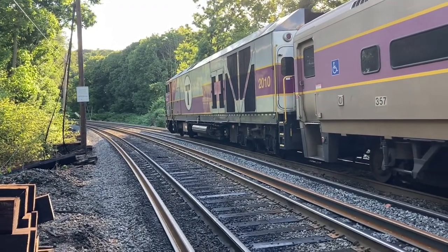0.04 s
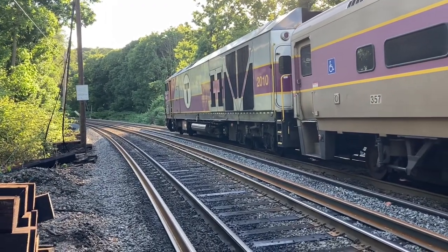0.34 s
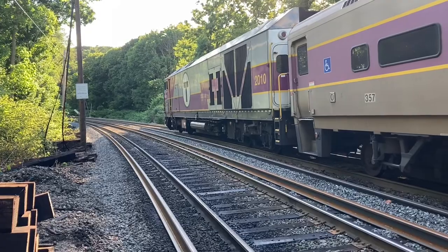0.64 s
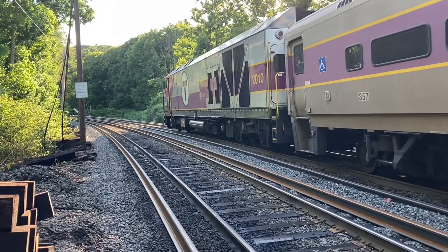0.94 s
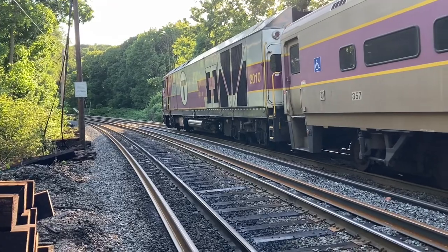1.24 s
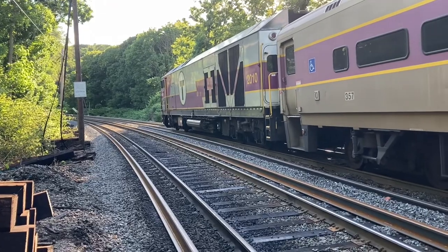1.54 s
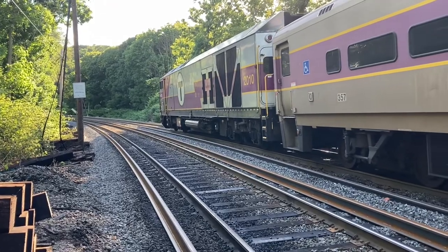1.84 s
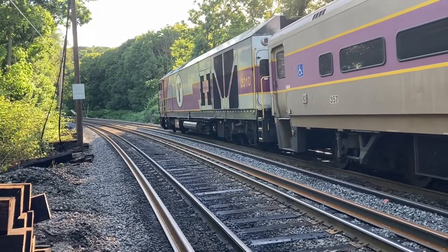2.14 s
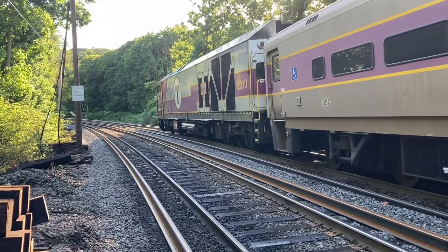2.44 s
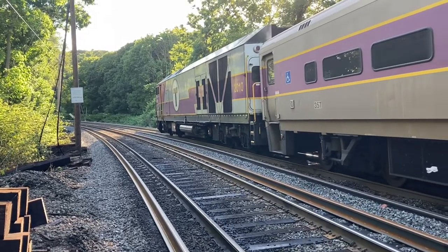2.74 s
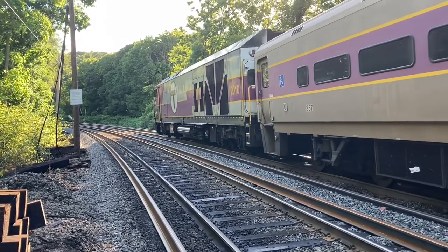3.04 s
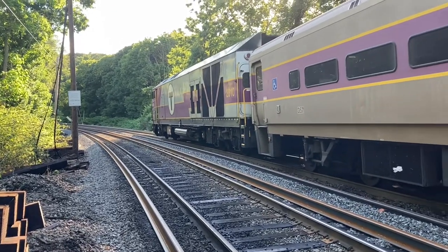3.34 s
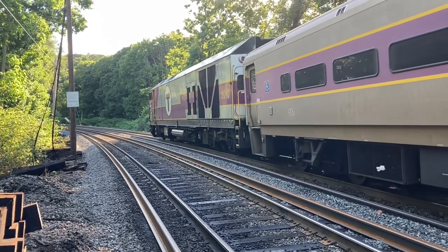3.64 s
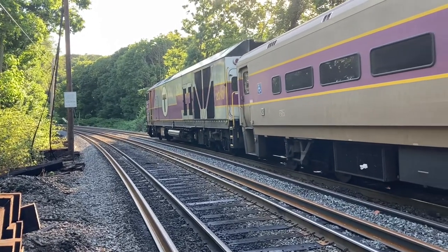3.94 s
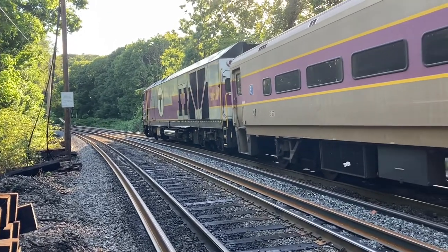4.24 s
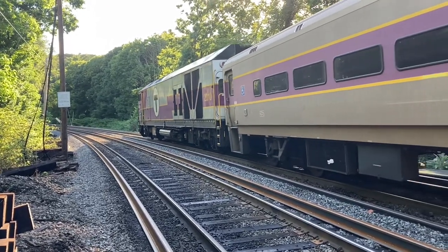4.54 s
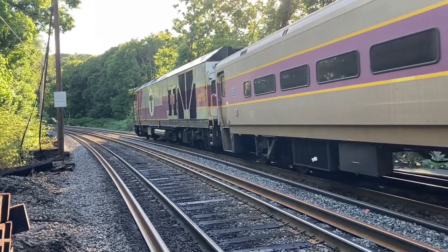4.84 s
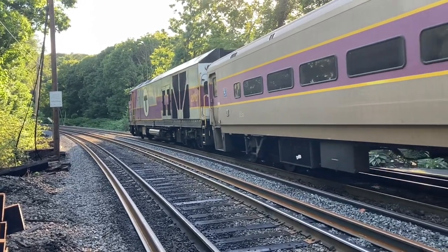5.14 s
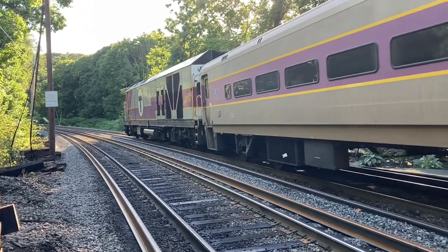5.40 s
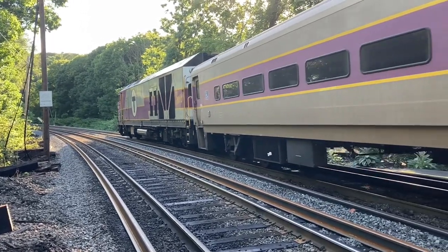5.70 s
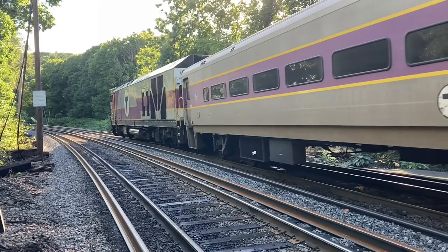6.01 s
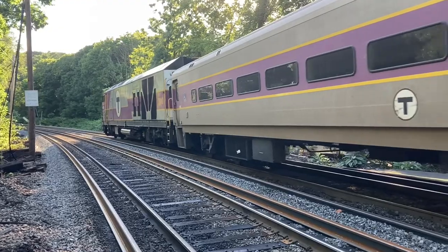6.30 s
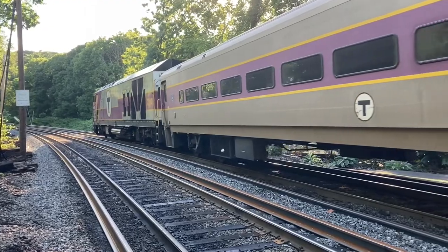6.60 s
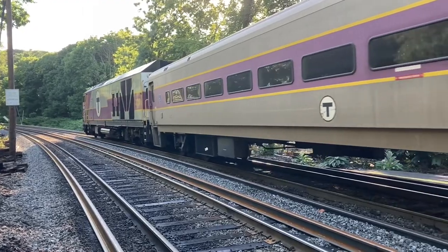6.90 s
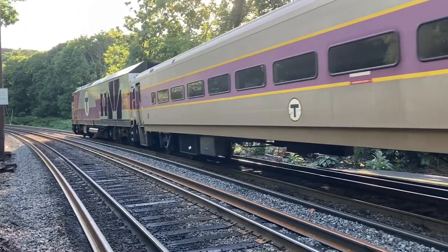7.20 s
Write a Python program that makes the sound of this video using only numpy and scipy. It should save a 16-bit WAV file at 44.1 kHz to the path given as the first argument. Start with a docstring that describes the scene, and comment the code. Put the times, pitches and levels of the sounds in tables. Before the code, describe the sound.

Heard from beside the next track, a passenger train gathers speed behind a throbbing diesel engine. Rushing exhaust and hissing fans ease off gradually as the locomotive draws ahead, with a faint whine and hum underneath. Nearer the microphones, steel wheels roll and let out a few faint, high squeals, then grow louder and rasp against the rail in short bursts toward the end.

```python
"""A diesel commuter train pulls away along a curve, heard on two microphones beside the next track.
Up ahead, the twelve-cylinder engine throbs through its silencer and speeds up; gears whine and the
electric drive hums. The roar of the exhaust and the hiss of the fans slowly recede with the locomotive.
Close by, the coach wheels roll nearer, ring thinly on the curve, squeal as they slip sideways
and now and then grind a flange on the rail."""
import sys
import numpy as np
from scipy import signal
from scipy.io import wavfile
from scipy.ndimage import uniform_filter1d

SR = 44100
rng = np.random.default_rng(int(sys.argv[2]) if len(sys.argv) > 2 else 0)


def digitize_waveform(pressure):
    """Quantize a signal to 16-bit integers and store it at the path in sys.argv[1].

    Rows of a 2-D input are taken as channels; values are limited to [-1, 1].
    """
    field = np.atleast_2d(pressure).T
    bounded = np.clip(field, -1, 1)
    quanta = np.round(bounded * 32767).astype(np.int16)
    wavfile.write(sys.argv[1], SR, quanta)


N = 324576
TIME = np.arange(N) / SR

# Exhaust tones: the twelfth order is the firing rate, the others come from unequal cylinders.
# Each row: multiple of the engine's cycle rate, level in dB before the silencer.
EXHAUST_ORDERS = [(3, -36), (6, -10.5), (9, -27.5), (10, -30), (11, -21.5), (12, -9.3), (13, -25.5),
                  (14, -34.5), (15, -12.5), (16, -31.5), (17, -29), (18, -22.5), (19, -30.5), (20, -32),
                  (21, -26)]
# The silencer's resonances, which the orders climb through. Each row: frequency in Hz, gain in dB.
SILENCER_GAIN = [(34, -22.5), (38, -15), (44, -11.5), (56, -16), (63, -4.5), (68, 0), (75, -4), (84, -11.5),
                 (93, -2.3), (101, -2.3), (110, -7.5), (118, -12), (126, -22), (160, -22)]
# Gear whines. Each row: multiple of the cycle rate, casing resonance in Hz, its width in Hz,
# level in dB on resonance.
GEAR_WHINES = [(66.5, 482, 48, -35), (99.7, 722, 26, -30), (109.9, 675, 46, -31.5), (120, 622, 19, -29.5)]
# Brief narrow-band swells of noise. Each row: peak time in seconds, pitch in Hz, peak level in dB,
# half-length in seconds.
NOISE_SWELLS = [(.28, 300, -28, 0.19), (.493, 610, -22.5, 0.023), (1.928, 628, -19.5, 0.013),
                (2.476, 600, -22, 0.036), (2.882, 611, -22.5, .025), (3.62, 661, -23.5, 0.027),
                (7.004, 690.4, -24.5, .025)]
# Hum of the electric drive. Each row: start and end pitch in Hz, start and end level in dB.
DRIVE_TONES = [(161.2, 136, -30.5, -53), (180, 139, -38, -41.5), (203.3, 243, -34, -42),
               (147.2, 106, -42, -36), (174.9, 174.8, -40.5, -41), (292.8, 292, -36, -49)]

# Tone colours of the four noises. Each row: frequency in Hz, relative density in dB.
ROAR_SPECTRUM = [(20, -18), (45, -3.5), (90, 4.5), (140, -2.5), (240, -5), (300, -4), (410, -4), (510, -5),
                 (620, 3), (720, -4), (790, -6.5), (880, -25.5), (1300, -34), (4000, -75)]
FAN_SPECTRUM = [(600, -14.5), (900, -2.5), (1070, 1.5), (1250, -2), (1500, -1.5), (2100, -6.5),
                (3100, -12.5), (4200, -12.5), (6200, -13.5), (9500, -14), (12000, -21), (13000, -26.5),
                (15000, -26.5), (16000, -42)]
ROLLING_SPECTRUM = [(500, -2), (900, -5), (1200, -9), (1450, 2.5), (1900, 1.5), (2130, 0.5), (2400, 6),
                    (2850, 1.5), (3500, -5.5), (4400, -11.5), (5200, -10), (6500, -12.5), (9000, -30),
                    (15000, -43)]
SCRAPE_SPECTRUM = [(800, -20), (1400, -5), (2100, -9), (2500, 0), (2950, 1), (3400, 0), (3800, -5),
                   (4600, -13), (7000, -23), (15000, -38)]
# How far the left microphone leads the right. Each row: frequency in Hz, phase lead in radians.
ROAR_PHASE = [(60, 0.89), (350, 0), (520, .3), (650, 0.72), (800, 0.82), (900, 1.6)]
FAN_PHASE = [(900, -2), (1100, -.7), (1700, -1.8), (2200, 1.3), (2400, 4), (3300, 4.6), (4400, 5.9),
             (5500, 3.7), (6600, 3.5), (7900, 6.2), (9800, 9.4), (11400, 12.6), (13000, 15.7),
             (14600, 18.8)]
WHEEL_PHASE = [(900, .7), (1400, 0), (1900, .3), (2200, 1.6), (2400, 4.7), (2850, 6.4), (3500, 6),
               (4700, 6.8), (5400, 8), (6600, 9.4), (7900, 12.5), (9800, 15.7)]

# Rolling noise grows as wheels near the microphones. Each row: time in seconds, level in dB.
WHEEL_APPROACH = [(0, -36), (2.4, -35.6), (3.3, -34.5), (4.3, -33.5), (5.2, -29.5), (6.1, -31),
                  (6.55, -32.5), (7.36, -29.5)]
# Modes of the wheel discs. Each row: pitch in Hz, width in Hz, start and end level in dB,
# lead of the left microphone in radians.
DISC_MODES = [(1723, 10, -51, -51, -1), (2235, 14, -48, -46.5, 1.2), (2837, 16, -54, -53, -.4),
              (4105, 18, -58, -60, -.2)]
# Sideways wheel slips. Each row: peak time in seconds, disc mode counted from 0, peak level in dB,
# half-length in seconds.
WHEEL_SQUEALS = [(.24, 0, -35.5, .05), (.36, 2, -41, .11), (.92, 0, -41, .06), (.94, 1, -42, .045),
                 (1.61, 2, -39.5, .07), (1.75, 0, -41, .16), (2.42, 0, -40, .17), (2.42, 2, -45.5, .12),
                 (3.67, 2, -41.5, .06), (4.39, 0, -41.5, .06)]
# Flange contacts. Each row: peak time in seconds, gain in dB, half-length in seconds, brightness 0 to 1.
FLANGE_SCRAPES = [(4.565, -32.5, .016, .2), (5.255, -35, .03, .8), (5.325, -26, .02, 1),
                  (5.47, -34, .05, 1), (5.916, -26, .018, .4), (6.01, -32.5, .08, .4),
                  (6.35, -32.5, .02, .4), (6.87, -32.5, .05, .2), (7.05, -35, .025, .4),
                  (7.27, -36.5, .06, .2)]

CYCLE_START_HZ, CYCLE_RISE_HZ_PER_S = 4.886, .3316  # one engine cycle is two turns of the crankshaft
BOOM_HZ, BOOM_WIDTH_HZ = 68, 7  # the silencer's main resonance
ROAR_DB, ROAR_FADE_DB_PER_S = -21.5, 0.3
FAN_DB, FAN_HALF_S, FAN_BEND = -29.5, 6.87, 2.8  # start level, time to lose 6 dB, steepness
GRIND_TOP_HZ, MICROPHONE_TOP_HZ = 3400, 15400


def exhaust_throb(cycle_hz, angle):
    """The engine up ahead: its orders swell through the silencer's resonances and beat into a throb."""
    throb = 0
    for multiple, db in EXHAUST_ORDERS:
        order = round(multiple)
        wander = amp(-39) * drift(rate_hz=1.3)  # uneven firing: the weak orders waver most
        size = (amp(db) + wander) * amp(at_hz(SILENCER_GAIN, order * cycle_hz))
        smear = .29 * (order - 13.2) ** 2  # the silencer delays each order differently, blurring the puffs
        boom_lag = np.arctan(2 * (order * cycle_hz - BOOM_HZ) / BOOM_WIDTH_HZ)
        throb += size * np.exp(1j * (order * angle + smear - boom_lag))
    return stereo(throb, lead=0.22) * amp([[-.8], [.8]])  # a little louder on the right


def exhaust_roar(angle):
    """Rushing exhaust gas pulses with the engine and fades as the locomotive draws away."""
    gas = noise(ROAR_SPECTRUM, ROAR_PHASE, likeness=0.98, patchy_db=1.5, ripple_db=.5, frame=2048)
    return amp(ROAR_DB - ROAR_FADE_DB_PER_S * TIME) * gas * hard_cylinder(angle, at=.5, depth_db=2.2)


def hard_cylinder(angle, at, depth_db):
    """One cylinder fires harder than the rest: a short swell in every engine cycle."""
    return unit_rms(amp(depth_db * np.exp(3 * (np.cos(angle - at) - 1))))


def gear_whine(cycle_hz, angle):
    """Gear tones rise with the engine, loudest where they cross a resonance of the casing."""
    whine = 0
    for order, hz, width_hz, db in GEAR_WHINES:
        casing = 1 / (1 + 2j * (order * cycle_hz - hz) / width_hz)
        flutter = unit_rms(1 + .35 * drift(rate_hz=11.0))
        whine += amp(db) * casing * np.exp(1j * order * angle) * flutter
    return stereo(whine, lead=0.84)


def electric_drive():
    """Tones of the electric drive glide apart as the train gathers speed."""
    hum = 0
    for start_hz, end_hz, start_db, end_db in DRIVE_TONES:
        turns = np.cumsum(np.linspace(start_hz, end_hz, N)) / SR
        waver = unit_rms(1 + .5 * drift(rate_hz=1.45))
        hum += amp(np.linspace(start_db, end_db, N)) * np.exp(2j * np.pi * turns) * waver
    return stereo(hum, lead=-0.4)


def cooling_fans(angle):
    """The fans' wide hiss holds, then falls away as a coach comes between them and the microphones."""
    level = amp(FAN_DB) / (1 + (TIME / FAN_HALF_S) ** FAN_BEND)
    hiss = noise(FAN_SPECTRUM, FAN_PHASE, likeness=0.93, patchy_db=1.5, ripple_db=2.5)
    return level * hiss * hard_cylinder(angle, at=-2.16, depth_db=0.5)


def rolling_wheels():
    """One track away, rough steel rolls on steel and the wheel discs ring unevenly at their modes."""
    rolling_db = np.interp(TIME, *np.transpose(WHEEL_APPROACH))
    rolling = noise(ROLLING_SPECTRUM, WHEEL_PHASE, likeness=0.54, patchy_db=2.0, ripple_db=1.5)
    wheels = amp(rolling_db) * rolling
    for hz, width_hz, start_db, end_db, lead in DISC_MODES:
        ring = drift(rate_hz=width_hz) * np.exp(2j * np.pi * hz * TIME)
        contact = unit_rms(amp(1.4 * drift(rate_hz=2.5).real))
        wheels += amp(np.linspace(start_db, end_db, N)) * contact * stereo(ring, lead)
    return wheels


def flange_scrapes():
    """A nearby flange touches the rail: a short rasp of many small slips, dull grind or bright clash."""
    slips = unit_rms(amp(2.5 * drift(rate_hz=80).real))
    rasp = slips * noise(SCRAPE_SPECTRUM, WHEEL_PHASE, likeness=.8, patchy_db=2.2, ripple_db=3)
    grind = signal.sosfiltfilt(signal.butter(8, GRIND_TOP_HZ, fs=SR, output="sos"), rasp)
    return sum(amp(db) * swell(peak_s, half_s) * (bright * rasp + (1 - bright) * grind)
               for peak_s, db, half_s, bright in FLANGE_SCRAPES)


def wheel_squeals():
    """Stick and slip briefly locks one disc mode into a faint, nearly pure tone."""
    squeals = 0
    for peak_s, mode, db, half_s in WHEEL_SQUEALS:
        hz = DISC_MODES[round(mode)][0]
        phase = 2 * np.pi * hz * TIME + .5 * drift(rate_hz=15).real
        squeals += amp(db) * swell(peak_s, half_s) * np.exp(1j * phase)
    return stereo(squeals, lead=-0.35)


def noise_swells(width_hz=49.1):
    """Brief narrow-band swells of noise at set times, mostly near 600-700 Hz."""
    swells = 0
    for peak_s, hz, db, half_s in NOISE_SWELLS:
        stray_hz = width_hz / 2 * drift(rate_hz=width_hz).real
        band = np.exp(2j * np.pi * (hz * TIME + np.cumsum(stray_hz) / SR))
        swells += amp(db) * swell(peak_s, half_s) * stereo(band, at_hz(ROAR_PHASE, hz))
    return swells


def noise(spectrum, lead, likeness, patchy_db, ripple_db, frame=1024):
    """Turbulent noise of rms one at the two microphones, with narrow patches that swell and fade."""
    hz, _, (common, apart) = signal.stft(rng.standard_normal((2, N)), SR, nperseg=frame)
    side = np.array([1, -1])[:, None, None]
    bands = np.sqrt(1 + likeness) * common + side * np.sqrt(1 - likeness) * apart
    patch_shape = np.outer(np.hanning(10), np.hanning(6))
    patches = unit_rms(signal.fftconvolve(rng.standard_normal(common.shape), patch_shape, "same"))
    ripple = unit_rms(uniform_filter1d(rng.standard_normal(len(hz)), 2))  # small resonances, reflections
    colour_db = at_hz(spectrum, hz) + ripple_db * ripple
    bands *= amp(colour_db[:, None] + patchy_db * patches)
    bands *= np.exp(.5j * side * at_hz(lead, hz)[:, None])
    return unit_rms(signal.istft(bands, SR, nperseg=frame)[1][:, :N])


def stereo(tone, lead):
    """A complex tone at the two microphones, the left one ahead by lead radians."""
    return np.sqrt(2) * (tone * np.exp(.5j * lead * np.array([[1], [-1]]))).real


def drift(rate_hz):
    """A complex random wander of rms one, with up to about rate_hz changes a second."""
    steps, steps_per_s = 2048, 256
    hz = np.fft.fftfreq(steps, 1 / steps_per_s)
    white = rng.standard_normal(steps) + 1j * rng.standard_normal(steps)
    slow = np.fft.ifft(np.fft.fft(white) * np.exp(-(hz / rate_hz) ** 2))
    return unit_rms(np.interp(TIME * steps_per_s, np.arange(steps), slow))


def swell(peak_s, half_s):
    """A bell-shaped rise and fall, down to 1/e at half_s either side of the peak."""
    return np.exp(-((TIME - peak_s) / half_s) ** 2)


def at_hz(table, hz):
    """A table's value at hz, interpolated on a logarithmic frequency axis."""
    table_hz, values = np.transpose(table)
    return np.interp(np.log(hz + 1), np.log(table_hz + 1), values)


def amp(db):
    """Decibels to gain."""
    return 10 ** (np.asarray(db) / 20)


def unit_rms(x):
    """Scales to an rms of one."""
    return x / np.sqrt(np.mean(abs(x) ** 2) + 1e-20)


def scene():
    """From the trackside: the locomotive ahead, speeding up evenly, and the coaches alongside."""
    cycle_hz = CYCLE_START_HZ + CYCLE_RISE_HZ_PER_S * TIME
    angle = 2 * np.pi * np.cumsum(cycle_hz) / SR
    machinery = exhaust_throb(cycle_hz, angle) + gear_whine(cycle_hz, angle) + electric_drive()
    rush = exhaust_roar(angle) + noise_swells() + cooling_fans(angle)
    coaches = rolling_wheels() + wheel_squeals() + flange_scrapes()
    return machinery + rush + coaches


def record(dry):
    """Both microphone channels lose the highest treble to a steep low-pass."""
    low_pass = signal.firwin(511, MICROPHONE_TOP_HZ, window=("kaiser", 9), fs=SR)
    return signal.oaconvolve(dry, low_pass[None], "same")


dry = scene()
out = record(dry)
digitize_waveform(out)
```